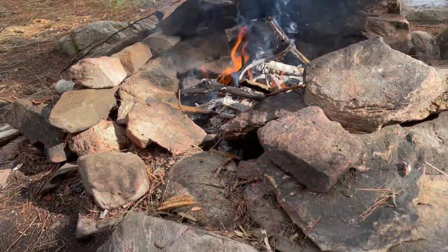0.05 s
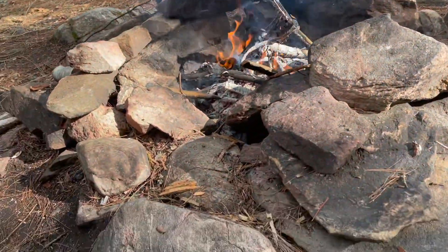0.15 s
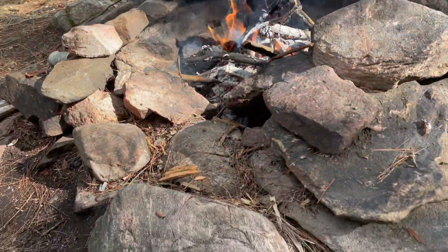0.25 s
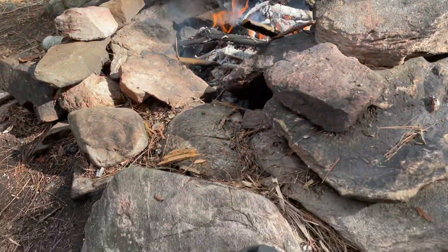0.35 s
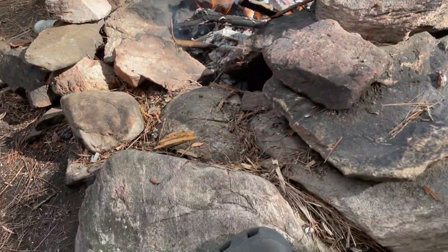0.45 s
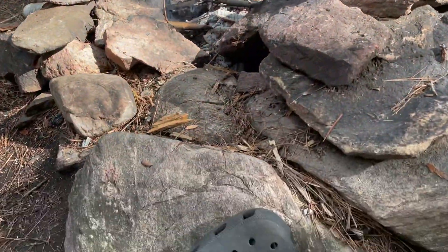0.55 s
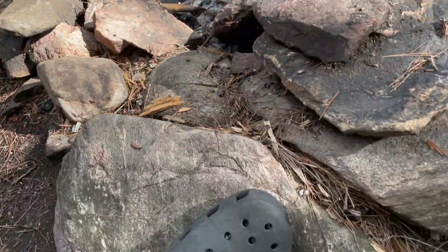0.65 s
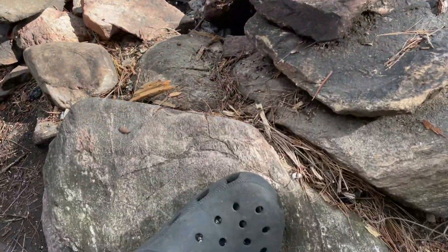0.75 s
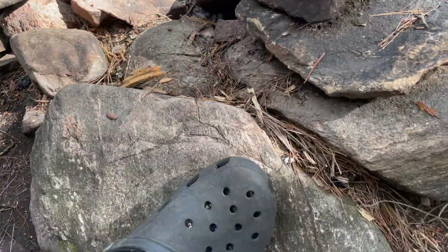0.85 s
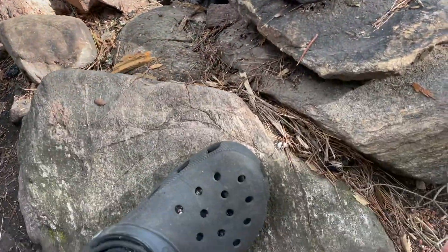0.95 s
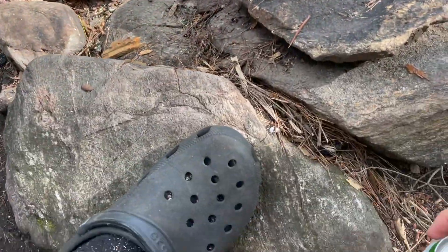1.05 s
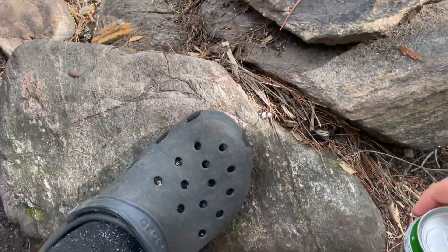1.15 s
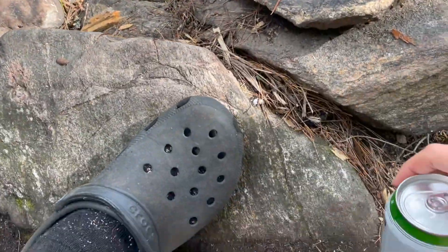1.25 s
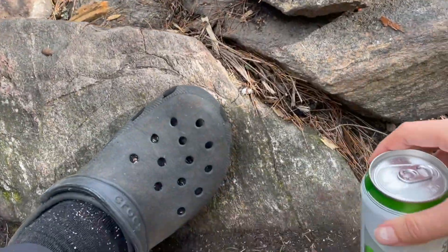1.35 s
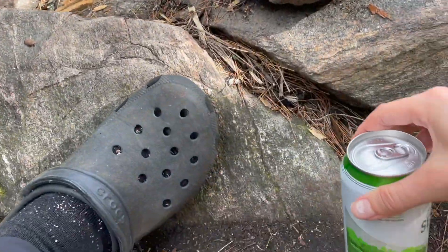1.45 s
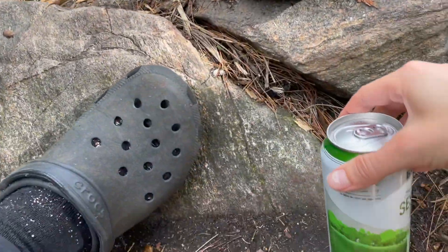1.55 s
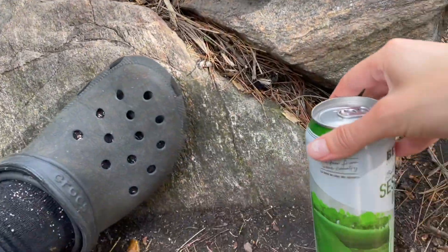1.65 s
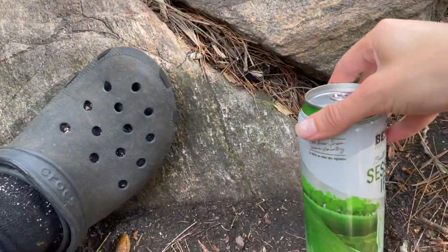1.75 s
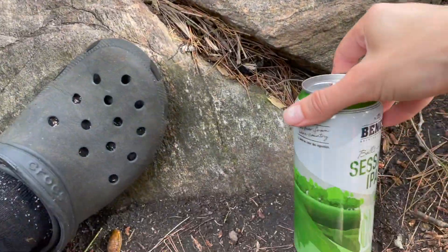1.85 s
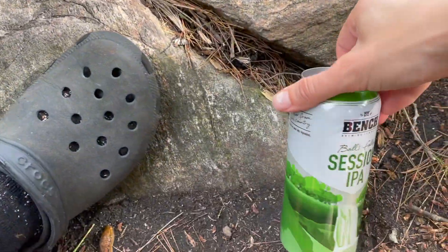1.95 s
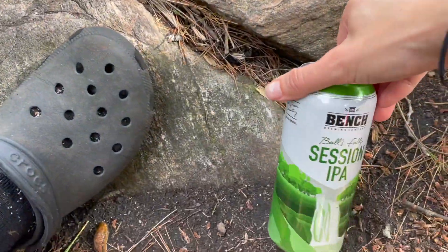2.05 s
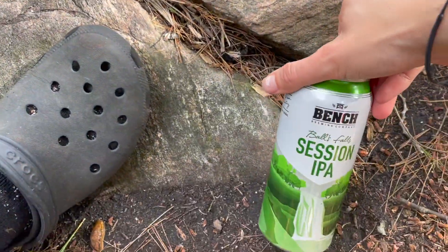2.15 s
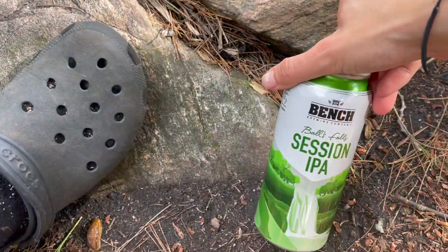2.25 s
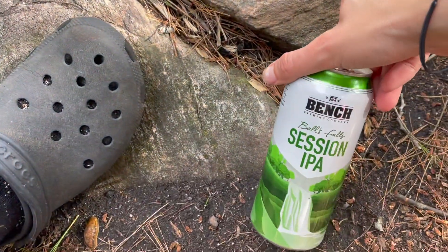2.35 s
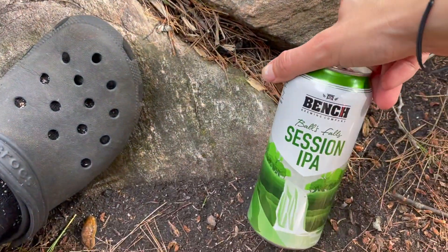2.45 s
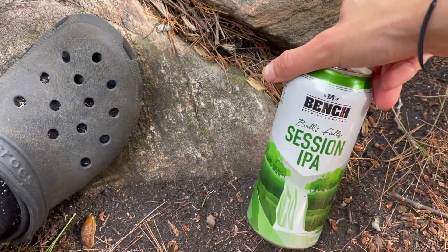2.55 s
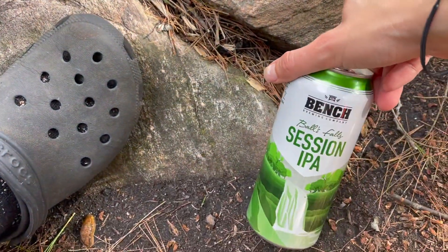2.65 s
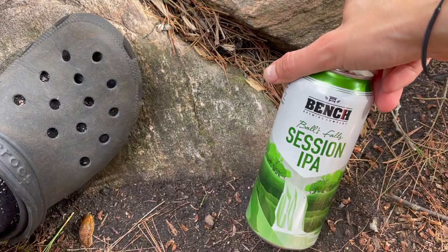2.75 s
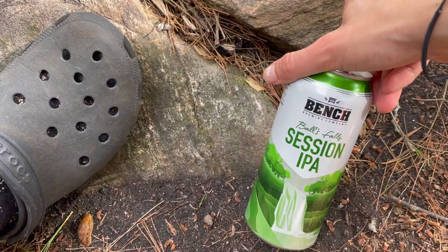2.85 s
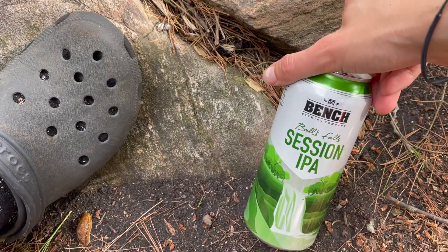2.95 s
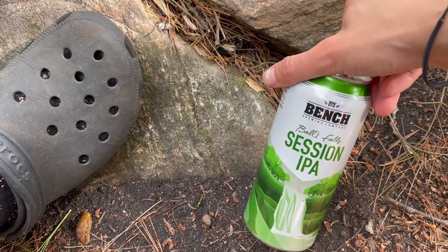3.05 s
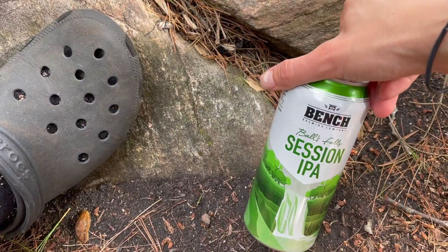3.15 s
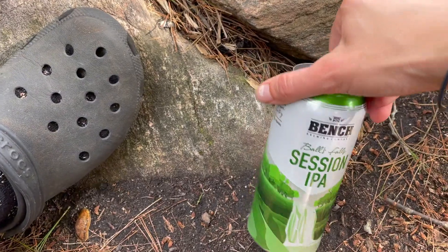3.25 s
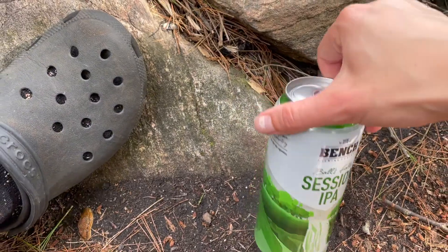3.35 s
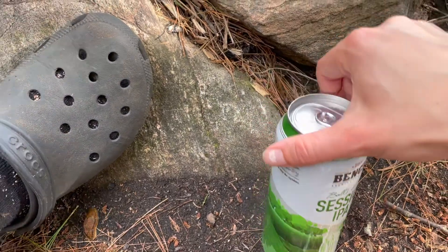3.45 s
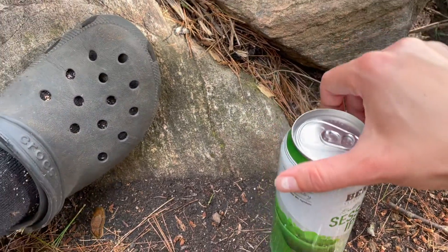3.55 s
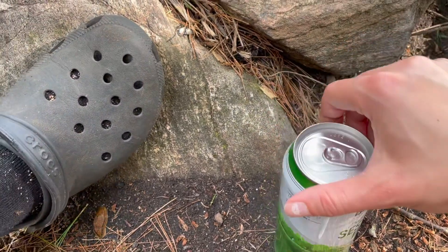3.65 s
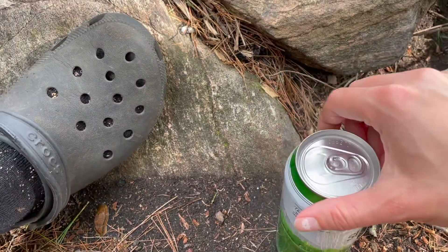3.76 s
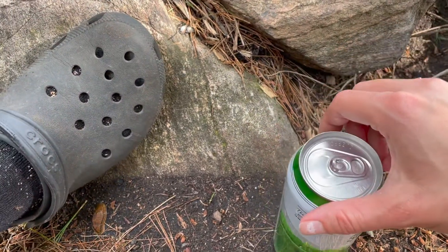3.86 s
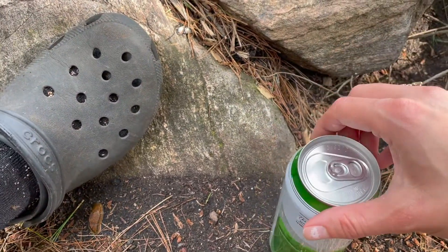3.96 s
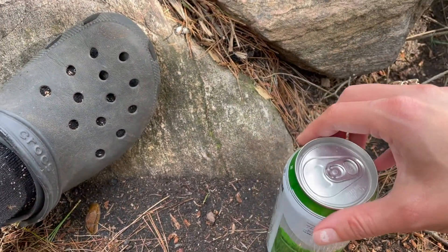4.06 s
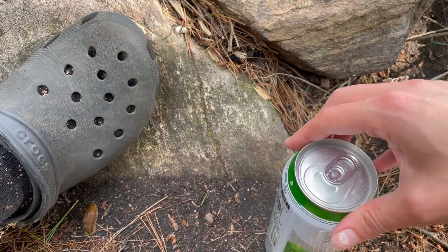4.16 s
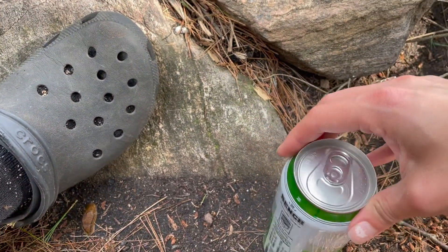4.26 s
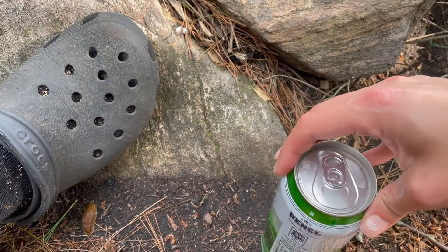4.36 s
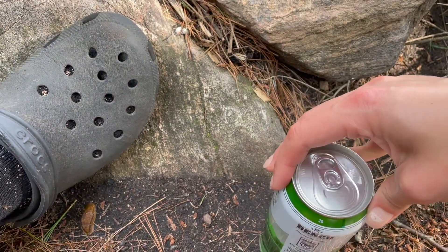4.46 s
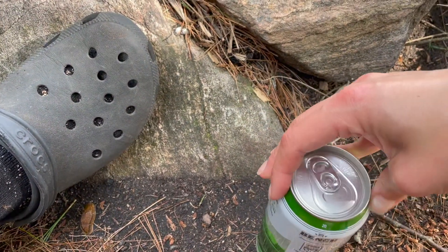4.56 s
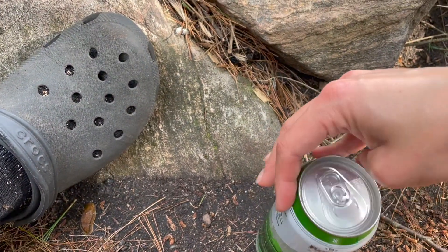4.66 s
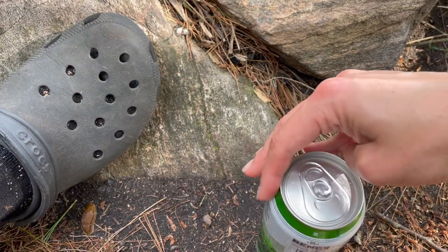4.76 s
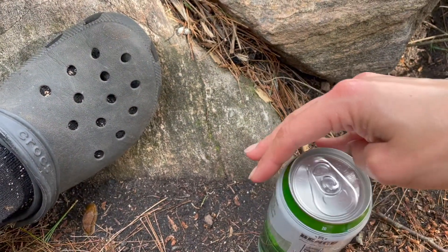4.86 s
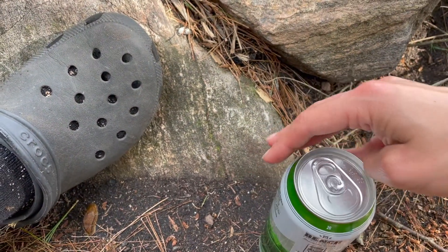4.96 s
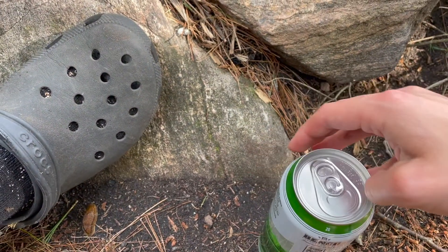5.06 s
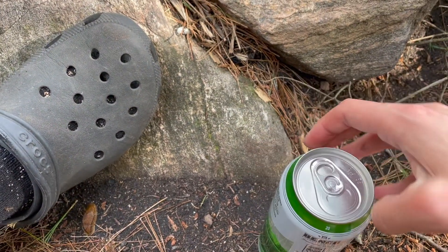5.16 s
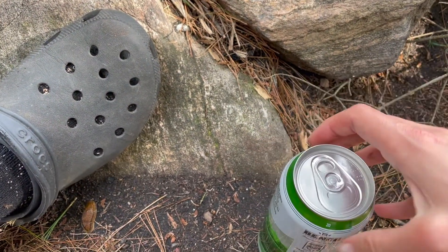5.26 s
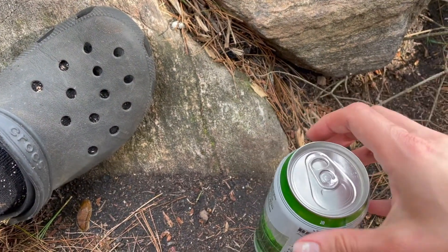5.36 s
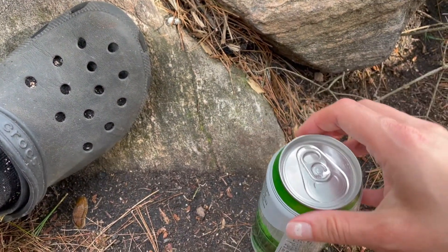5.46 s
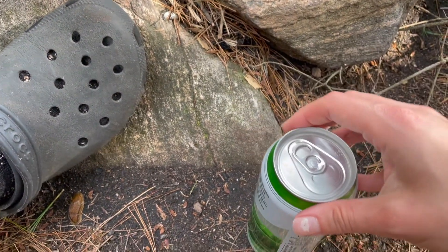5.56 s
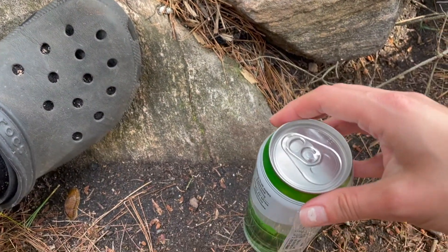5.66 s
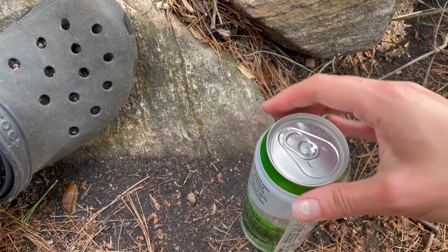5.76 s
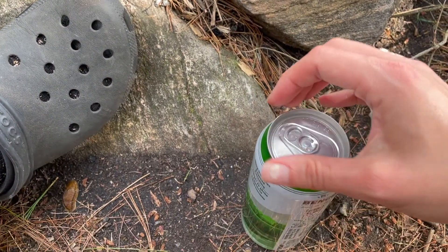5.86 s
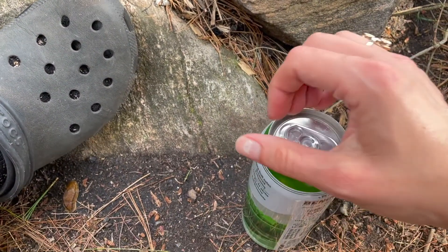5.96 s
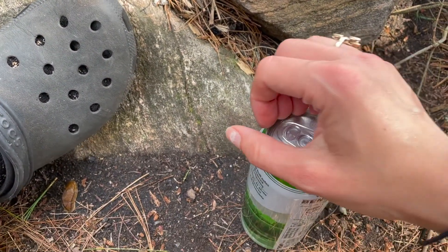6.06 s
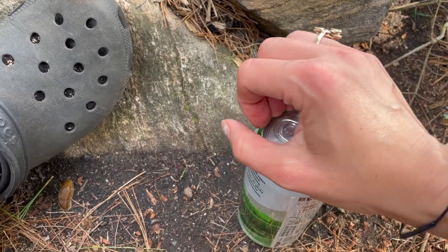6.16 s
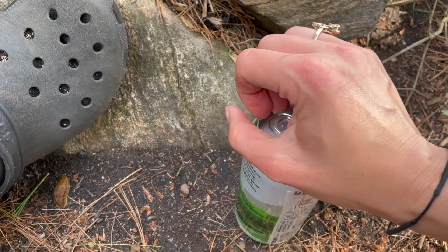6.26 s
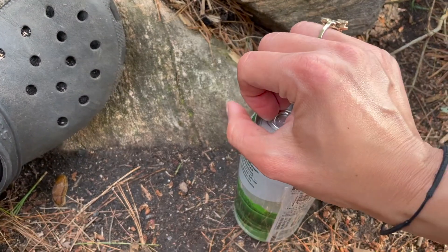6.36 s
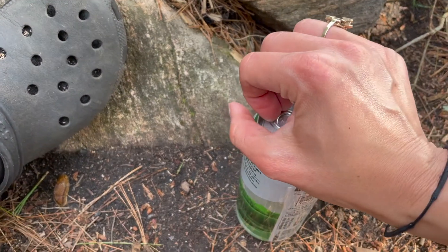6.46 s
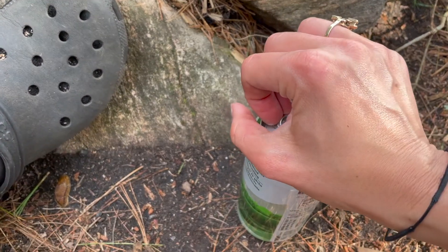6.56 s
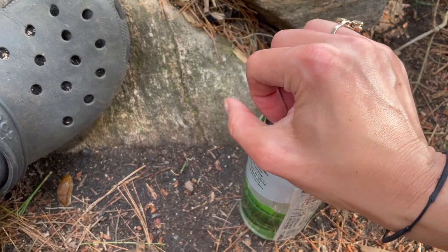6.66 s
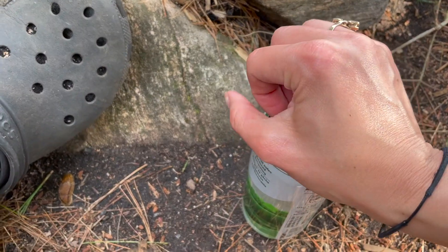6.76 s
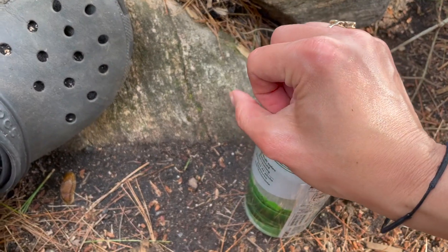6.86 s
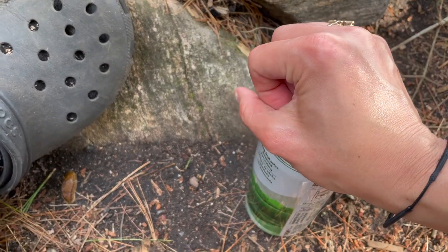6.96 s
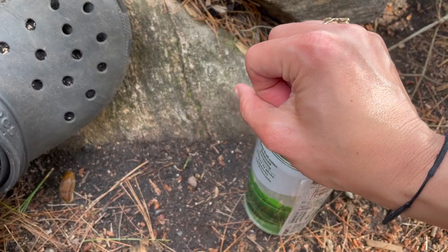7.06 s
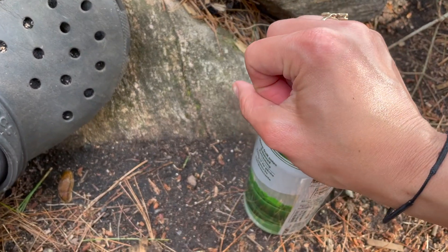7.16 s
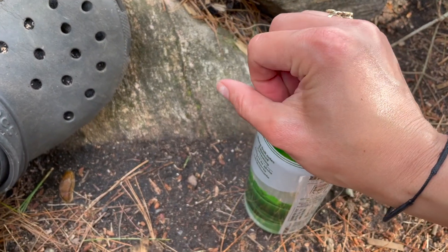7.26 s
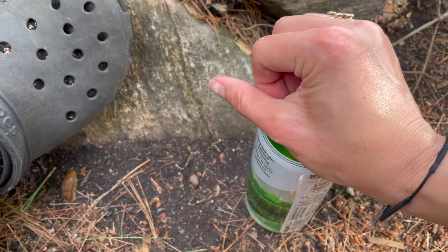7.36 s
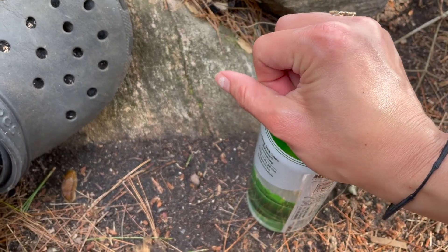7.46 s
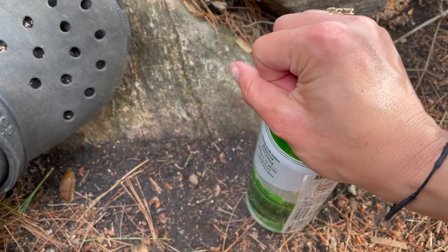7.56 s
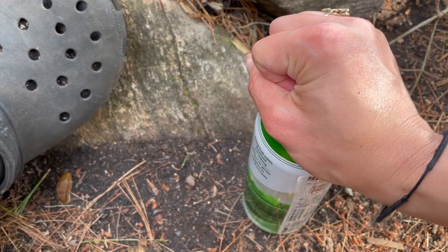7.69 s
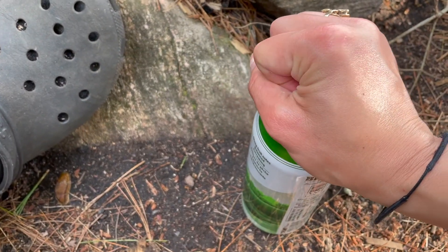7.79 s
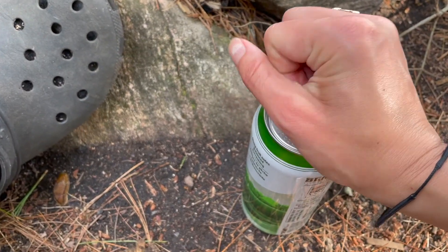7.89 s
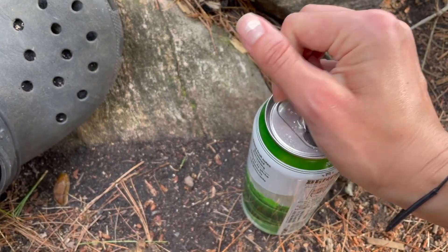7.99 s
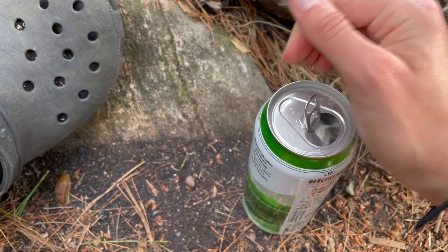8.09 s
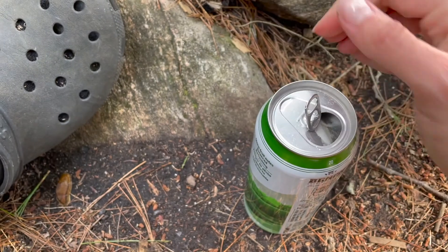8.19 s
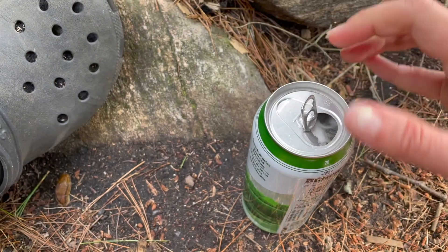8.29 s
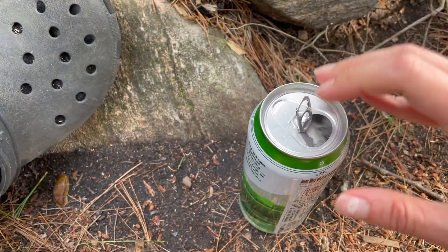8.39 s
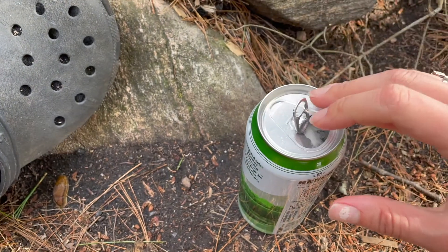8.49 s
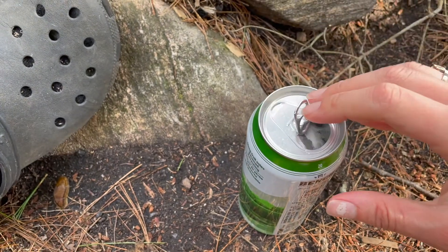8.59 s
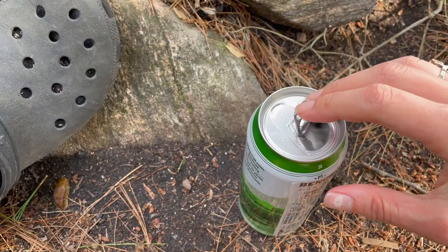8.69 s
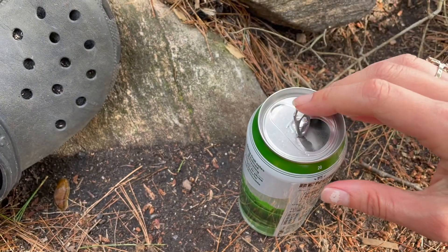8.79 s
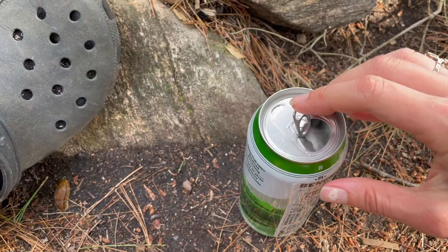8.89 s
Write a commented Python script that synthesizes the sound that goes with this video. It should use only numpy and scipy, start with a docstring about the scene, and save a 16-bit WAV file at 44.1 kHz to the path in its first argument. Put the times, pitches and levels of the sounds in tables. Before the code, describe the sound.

Outdoors by a campfire, with low rumble, thin sizzle and sharp wood pops. A full can grinds and bumps on gritty soil very close to the microphone, fingers slide and click on it, the tab creaks, the seal snaps with a gas burst, then the lid tears loudly open. Soft fizz and metallic taps follow.

```python
"""Beside a campfire, a full drink can is ground into gritty soil, tapped, and cracked open close by.
The fire hisses and pops over a low outdoor rumble: shaped noise and short bursts of noise.
Scrapes, clicks and knocks are noise and grains that set the can's resonances ringing.
The tab creaks in slips, the seal snaps in ragged bursts, gas rushes out as fluttering noise,
the lid tears in and the open can rings and fizzes."""
import sys
import numpy as np
from scipy import signal
from scipy.fft import rfft, irfft
from scipy.io import wavfile
from scipy.ndimage import uniform_filter1d

SR = 44100
rng = np.random.default_rng(int(sys.argv[2]) if len(sys.argv) > 2 else 0)


def master(y):
    """Save y as 16-bit WAV."""
    cut = np.clip(np.atleast_2d(y).T, -1, 1)
    pcm = np.round(cut * 32767)  # scale
    wavfile.write(sys.argv[1], SR, pcm.astype(np.int16))


N = 393813
TIME = np.arange(N) / SR  # seconds
HZ = np.fft.rfftfreq(N, 1 / SR)

# In every colour table, each row: frequency in Hz, relative level in dB per Hz.
# In every table of resonances, each row: frequency in Hz, width in Hz (wide dies fast), relative level in dB.

# Colour of the low outdoor rumble.
RUMBLE_COLOUR = [(20, -30.5), (52, 2), (81, 4), (128, -3.5), (181, 1.5), (250, -12.5), (375, -22.5),
                 (700, -31.5), (1500, -40)]
# Colour of the fire's breathy wash.
WASH_COLOUR = [(400, -35), (1280, 0), (4000, 3.5), (7000, 3.5), (11000, -7), (14300, -39.5)]
RUMBLE_DB, WASH_DB = -34.5, -66.5  # steady levels
# The fire flares up. Each row: start in seconds, length in seconds, level in dB.
FLARES = [(0.05, 1.71, -44.5), (1.01, 1.79, -47)]
# Rise and fall of the fire's thin sizzle. Each row: time in seconds, level in dB before SIZZLE_LIFT_DB.
SIZZLE_CURVE = [(0.1, -52), (0.7, -41), (1.55, -56.5), (2.0, -45.5), (3.5, -54), (4.5, -45.5), (5.2, -50.5),
                (8.9, -55)]
SIZZLE_LIFT_DB = 6.5
# Colour of the sizzle and of the bright top of the pops.
SIZZLE_COLOUR = [(3000, -12.5), (5800, -9), (9000, -6), (11000, 4), (14000, 0.5), (15800, 8.5)]
# The background dips briefly. Each row: start in seconds, length in seconds, depth in dB.
LULLS = [(3.73, 0.1, -3), (5.79, 0.13, -5.5), (7.592, 0.17, -7)]
# Fire pops. Each row: start in seconds, peak of the bright top in dB, peak of the woody body in dB.
POPS = [(0.1143, -34, -60), (0.2235, -13.5, -23.5), (0.2475, -22, -25), (0.402, -23.5, -60),
        (1.002, -45, -40.5), (1.1898, -12, -19), (1.2286, -28, -44), (1.906, -27, -42), (2.2366, -27, -39),
        (2.9464, -25.5, -41.5), (3.2468, -22.5, -49), (3.6533, -24, -45), (4.17, -16, -43),
        (4.551, -25, -42), (4.899, -21, -31), (5.095, -20.5, -47), (5.1738, -32, -36), (5.322, -30, -38.5),
        (5.441, -28, -37.5), (5.7652, -26.5, -60), (6.906, -17, -52), (7.452, -31, -61), (7.646, -18, -30),
        (8.166, -34, -43), (8.3167, -21.5, -47), (8.869, -27, -38)]
# Colour of a pop's woody body.
WOOD_COLOUR = [(300, 10.5), (1000, 16.5), (1700, 1.5), (2600, 17), (4500, 17), (7000, 18), (11000, -30)]
# Dry needles and soil shifting. Each row: start in seconds, level in dB, length in seconds.
RUSTLES = [(1.243, -44, 0.11), (4.432, -41.5, 0.33), (4.935, -47, 0.56), (5.128, -47.5, 0.16),
           (6.283, -46.5, 0.22), (8.355, -54.5, 0.34)]
# Dull bumps of the can on the soil. Each row: start in seconds, peak in dB, factor on the pitch.
BUMPS = [(2.669, -30.5, 0.76), (3.405, -25, 1.62), (3.434, -23, 0.61), (3.894, -26, 1.74),
         (3.931, -19.5, 0.52), (4.18, -32.5, 1.42), (4.374, -32.5, 1.9), (4.691, -27.5, 1.7),
         (4.715, -20, 0.58), (5.937, -23.5, 0.64)]
# Colour of a thud on soil, before the factor on the pitch.
SOIL_COLOUR = [(60, -20.5), (130, 10), (235, -0.5), (330, 3), (450, -16.5), (800, -21), (2500, -40)]

# Strokes of the can's base turning on grit. Each row: start in seconds, length in seconds, level of the
# drive in dB, grip of the hand from 0 to 1, low cut in Hz (high for a light touch).
RUBS = [(1.832, 0.12, -36, 1, 300), (3.082, 0.25, -45, 1, 2760), (3.274, 0.32, -43, 0.78, 1350),
        (3.551, 0.22, -45.5, 0.34, 1880), (3.823, 0.65, -36.5, 0.14, 1450), (4.09, 0.71, -39.5, 0.4, 1420),
        (4.4, 0.036, -32, 0, 1000), (4.671, 0.34, -45, 0.27, 1780), (5.361, 0.38, -40, 0.53, 1590),
        (5.986, 0.046, -35, 0, 2300), (6.186, 0.17, -35, 0.01, 2480), (8.214, 0.13, -48.5, 0.97, 2800)]
RUB_RISE, RUB_FALL = 0.35, 0.4  # shares of a stroke spent gathering speed and slowing down
# The broad colour of scraping grit.
GRIT_COLOUR = [(400, 17.5), (900, 11), (2500, 3.5), (5000, -8.5), (7000, 9), (9000, -8), (12000, -28.5)]
# Resonances of the full can's wall.
FULL_CAN = [(1089, 18.6, 8.5), (1953, 53, 8.5), (2380, 165, -8), (2710, 51, -6), (3950, 110, -3),
            (4594, 146, 2), (5100, 79, -2.5)]
# Resonances of the wall damped by the hand.
GRIPPED_CAN = [(1081, 26, 22), (2250, 134, 11.5), (2397, 43, 14.5), (4600, 580, -2)]
WALL_DRIFT, WALL_SWELL_DB = 0.01, 3.5  # typical shift (share of the pitch) and swell as the contact moves
# Fingertips sliding over the can. Each row: start in seconds, length in seconds, level of the grain in dB,
# level of the dry hiss in dB.
SLIDES = [(4.468, 0.16, -56, -49), (5.464, 0.23, -45.5, -45.5), (5.904, 0.66, -49, -44.5),
          (6.494, .46, -49.5, -43), (6.761, 0.058, -38.5, -54), (8.2, 0.4, -54, -50.5)]
# Colour of the fine grain under the fingertips.
FINGERTIP_COLOUR = [(900, -9.5), (2400, -1.5), (3800, 4.5), (5200, 2), (6800, 9.5), (9000, -8)]
# Grit and fingernail clicks on the sealed can. Each row: start in seconds, peak in dB, grip of the hand
# from 0 to 1, time in seconds for the drive to fall 60 dB.
CLICKS = [(3.246, -27, 1, 0.12), (3.316, -35.5, 0.9, 0.078), (4.614, -24.5, 0.76, 0.044),
          (4.668, -22.5, 0.3, 0.089), (4.682, -23.5, 0.8, 0.024), (4.794, -30.5, 0.6, 0.021),
          (4.89, -27, 0, 0.02), (4.95, -37, 0.1, 0.026), (6.464, -12, 0.16, 0.012),
          (6.4676, -15, 0.2, 0.015)]
NAIL_CUT_HZ = 2060  # a hard, light click hardly stirs the wall's lowest resonance

OPEN_S = 7.59  # the opening is free from here
# Tab and fingers knocking on the open can. Each row: start in seconds, peak in dB, time in seconds for the
# drive to fall 60 dB, factor on the resonances.
KNOCKS = [(7.918, -26, 0.0055, 0.79), (8.669, -13, 0.01, 0.9), (8.692, -31, 0.094, 0.66),
          (8.702, -28.5, 0.13, 0.91), (8.733, -38.5, 0.27, 0.8), (8.886, -31.5, 0.33, 0.95)]
# Resonances of the open can, before that factor.
OPEN_CAN = [(1344, 71, 16), (2105, 160, -1), (2570, 210, 13.5), (3230, 200, 3.5), (3800, 250, -3.5),
            (4600, 110, -3)]
# The opening's moving hollow note. Each row: time in seconds, frequency in Hz.
MOUTH_NOTE = [(7.6, 785), (7.649, 835), (7.907, 860), (7.928, 700), (8.03, 635), (8.159, 675)]
FIZZ_DB, FIZZ_T60, FIZZ_END_S = -41.5, 3.2, 8.27  # the foam settles: level, seconds to fall 60 dB, end
# The air in the can is jolted as the flap is pushed in. Each row: start in seconds, level in dB.
JOLTS = [(7.587, -24), (7.914, -31)]
JOLT_T60 = 0.061  # seconds to fall 60 dB
# Resonances of the lid once it is torn open.
TORN_LID = [(1097, 20, 6), (1230, 16, 6.5), (1770, 12, -9), (2020, 35, 1.5), (2870, 8.5, 0),
            (3680, 13, 8.5)]
LID_RING_DB, LID_RING_T60 = -33.5, 0.033  # the tear sets it ringing: peak, seconds for the drive to fall 60 dB
# The tab scrapes as it is bent back. Each row: start in seconds, peak in dB, time in seconds for the drive
# to fall 60 dB.
TAB_SCRAPES = [(7.794, -24, 0.015), (7.805, -17, 0.029), (7.818, -20, 0.0066)]
FINGER_DAMPING = 6  # a finger on the lid makes it die this many times faster

CREAK_S, SLIP_PERIOD_S, SLIP_COUNT = 6.825, 0.0185, 9
SLIP_DB, SLIP_GROWTH_DB_PER_S = -34, 33  # the tab's slips get louder as the pull grows
SLIP_SCATTER_DB = 1.5
# Colour of the finger dragging on the tab.
DRAG_COLOUR = [(300, -19), (650, 3), (1100, -13), (4000, -28)]
DRAG_DB = -47
# Puffs of gas through the cracked seal. Each row: start in seconds, length in seconds, flow in dB.
PUFFS = [(6.977, 0.14, -11.5), (7.089, 0.031, -22.5), (7.175, 0.077, -24.5), (7.28, 0.058, -29.5),
         (7.08, 0.42, -41.5), (7.497, 0.062, -23.5)]
PUFF_RISE, PUFF_FALL = 0.29, 0.39  # shares of a puff in which the crack widens and closes
VENT_DB, VENT_RISE_S, VENT_T60 = -24, 0.066, 0.53  # the last gas leaves through the full opening
# Colour of the rushing gas.
GAS_COLOUR = [(300, -13), (900, -1.5), (1450, 7.5), (2000, -8), (3200, 7.5), (6700, 3), (12000, -36)]
# Colour of the shrill jet, also used for the fingertips' dry hiss.
JET_COLOUR = [(4000, -32), (7000, -14.5), (9000, -12), (10500, 6), (14800, 8)]
HOLLOW_HZ, HOLLOW_RISE_HZ, HOLLOW_WIDTH_HZ = 1234, 190, 325  # the cupped hand sounds higher at full flow
# The tab breaking the seal and tearing the lid. Each row: start in seconds, peak in dB, rise in seconds,
# time in seconds for the drive to fall 60 dB, top sizzle in dB against that peak, low cut in Hz (high while
# the lid is still taut).
SNAPS = [(6.9867, -1, 0.00095, 0.013, 0, 2400), (7.532, -21, 0.00065, 0.011, -24.5, 900),
         (7.541, -10, 0.001, 0.014, -27.5, 900), (7.5455, 2, 0.0031, 0.01, -5, 1000),
         (7.555, -21, 0.0012, 0.13, -6.5, 700), (7.582, -3.5, 0.0076, 0.025, -0.5, 250),
         (7.59, -4.5, 0.00095, 0.0092, -9, 60), (7.597, -30.5, 0.0016, 0.17, -5.5, 400)]
# Resonances of the bending lid.
LID = [(1600, 880, -6), (2990, 46, 0.5), (3670, 300, -2.5), (4870, 400, -17)]
LID_SHIFT = .02  # typical shift of the lid's resonances from jerk to jerk as it bends
# Broad colour of tearing metal.
TEAR_COLOUR = [(120, -16), (250, 1), (480, -11), (1470, -19), (2300, -15.5), (3200, -2.5), (6300, -7.5),
               (10000, -24.5), (14000, -64)]

# How near sounds differ in phase at the two microphone ports. Each row: frequency in Hz, radians that left leads.
PORT_PHASE = [(50, 0), (500, .9), (1300, .7), (2400, 1.3), (6500, 1.9), (8500, 3), (10500, 1.1),
              (12300, .2)]
# How they differ in level. Each row: frequency in Hz, left minus right in dB.
PORT_BALANCE = [(100, 0), (600, 2), (1300, -.5), (2400, 3.5), (4400, 3), (8100, -.5), (15000, 0)]
# Stereo width of the surroundings. Each row: frequency in Hz, left-right likeness from -1 to 1.
LIKENESS = [(150, 0.96), (380, 0.76), (950, -0.085), (6000, 0.11), (11000, -0.78), (13000, 1)]
EDGE_HZ = 15880  # top of the final band


def gain_of(db):
    """Decibels to amplitude."""
    return 10 ** (np.asarray(db) / 20)


def evened(x):
    """Scales to an rms (average strength) of 1."""
    return x / np.sqrt(np.mean(x ** 2) + 1e-20)


def read(points, hz):
    """Reads a table on a log-frequency axis."""
    f, value = np.transpose(points)
    return np.interp(np.log(hz + 1), np.log(f + 1), value)


def level(rows):
    """A gain curve from rows of seconds and dB."""
    s, db = np.transpose(rows)
    return gain_of(np.interp(TIME, s, db))


def add(mix, s, sound):
    """Mixes a sound in at a time in seconds."""
    part = mix[max(round(s * SR), 0):][:len(sound)]
    part += sound[:len(part)]


def swell(start, length, rise, fall):
    """Smooth attack, hold and release; rise and fall are shares of the length."""
    u = (TIME - start) / length
    on = (u > 0) & (u < 1)
    out = np.zeros(N)
    ramp = np.clip(np.minimum(u[on] / rise, (1 - u[on]) / fall), 0, 1)
    out[on] = np.sin(np.pi / 2 * ramp) ** 2
    return out


def dying(start, rise, t60):
    """A quick rise, then a steady decay that falls 60 dB in t60 seconds."""
    t = TIME - start
    return np.clip(t / rise, 0, 1) * np.exp(-np.log(1000) * np.maximum(t - rise, 0) / t60)


def wander(per_s):
    """Slow chance of rms 1 that changes about so often a second."""
    knots = np.arange(0, N / SR + 1, .5 / per_s)
    return evened(np.interp(TIME, knots, rng.standard_normal(len(knots))))


def grains(per_s, spread_db):
    """Random clicks of rms 1, mostly small with a few large."""
    sizes = gain_of(spread_db * np.minimum(rng.exponential(1, N), 4))
    present = rng.random(N) < per_s / SR
    return evened(sizes * rng.choice([-1, 1], N) * present)


def burst(rise, t60, size=6000):
    """A crowd of tiny fractures, as noise that swells and dies away."""
    t = np.arange(size) / SR
    decay = gain_of(-60 * np.maximum(t - rise, 0) / t60)
    return rng.standard_normal(size) * np.minimum(t / rise, 1) * decay


def through(x, response):
    """Plays a drive through an impulse response."""
    return signal.oaconvolve(x, response)[:len(x)]


def above(x, cut_hz):
    """Weakens what lies under a frequency."""
    return signal.sosfilt(signal.butter(2, cut_hz, "high", fs=SR, output="sos"), x)


def colour(spectrum, size=2048):
    """An impulse response of unit energy with this spectrum and no sound ahead of time."""
    db = np.maximum(read(spectrum, abs(np.fft.fftfreq(size, 1 / SR))), -90)
    log_gain = np.log(gain_of(db))
    # the Hilbert transform gives the phase that puts the energy first
    taps = np.fft.ifft(np.exp(np.conj(signal.hilbert(log_gain)))).real
    return taps / np.linalg.norm(taps)


def body(modes, spectrum, broad_db, pitch=1, damping=1, size=9000):
    """Impulse response of a can: decaying resonances over a broad, dead response."""
    t = np.arange(size) / SR
    ring = np.zeros(size)
    for hz, width, db in modes:
        decay = np.exp(-np.pi * width * damping * t)
        ring += gain_of(db) * width * decay * np.cos(2 * np.pi * hz * pitch * t)
    ring = ring / np.linalg.norm(ring)
    add(ring, 0, gain_of(broad_db) * colour(spectrum))
    return ring / np.linalg.norm(ring)


def resonate(x, hz, width):
    """A resonance of gain 1 that follows a pitch curve for as long as it is driven."""
    driven, out = np.flatnonzero(x), np.zeros(N)
    on = slice(driven[0], driven[-1] + SR // 20)
    turn = np.exp(2j * np.pi * np.cumsum(hz[on]) / SR)
    r = np.exp(-np.pi * width / SR)
    # shift the pitch down to zero, smooth there, and shift it back up
    smooth = signal.lfilter([1 - r], [1, -r], x[on] * turn.conj() + 1e-18)
    out[on] = 2 * (turn * smooth).real
    return out


def crowded(x, t60, size=4000):
    """A crowd of weak, close resonances, as in a thin shell or a small hollow."""
    tail = burst(1 / SR, t60, size)
    return through(x, tail / np.linalg.norm(tail))


def loudest(x, db, size=88):
    """Sets the level of a hit's loudest 2 ms."""
    return gain_of(db) * x / np.sqrt(uniform_filter1d(x ** 2, size, mode="constant").max())


def surround(spectrum):
    """Stereo noise of rms 1, partly alike in both ports."""
    a, b = rfft(rng.standard_normal((2, N)))
    same = np.clip(read(LIKENESS, HZ), -1, 1)
    mid, side = a * np.sqrt(1 + same), b * np.sqrt(1 - same)
    return evened(irfft(np.array([mid + side, mid - side]) * gain_of(read(spectrum, HZ)), N))


def ports(x):
    """A near source reaches the left port with a phase lead and mostly louder."""
    half = np.exp(.5j * read(PORT_PHASE, HZ)) * gain_of(read(PORT_BALANCE, HZ) / 2)
    return irfft(rfft(x) * np.array([half, 1 / half]), N)


def rocks(x, t60, size=9000):
    """Short scattered echoes from the stones and the ground, different in each ear."""
    t = np.arange(size) / SR
    sparse = rng.random((2, size)) < .1
    taps = rng.standard_normal((2, size)) * sparse * (t > .002) * gain_of(-60 * t / t60)
    return np.array([through(x, side / np.linalg.norm(side)) for side in taps])


def outdoors():
    """Lumpy low rumble, the fire's flaring wash and its thin sizzle, all from shaped noise."""
    gusts = gain_of(1.7 * wander(per_s=60) + 1.3 * wander(per_s=6))
    rumble = gain_of(RUMBLE_DB) * evened(surround(RUMBLE_COLOUR) * gusts)
    flares = sum(gain_of(db) * swell(s, length, rise=0.33, fall=0.7) for s, length, db in FLARES)
    wash = (gain_of(WASH_DB) + flares) * surround(WASH_COLOUR)
    crackle = through(crowded(grains(per_s=90, spread_db=4.5), t60=.012), colour(SIZZLE_COLOUR))
    sizzle = surround(SIZZLE_COLOUR) * gain_of(1.5 * wander(per_s=20)) + gain_of(-8.0) * crackle
    return rumble + wash + gain_of(SIZZLE_LIFT_DB) * level(SIZZLE_CURVE) * sizzle


def lulls():
    """Gain of the background through its brief dips."""
    return gain_of(sum(db * swell(s, length, rise=.5, fall=0.48) for s, length, db in LULLS))


def fire_pops():
    """Pockets in the wood burst: a woody crack with a bright, very short top."""
    out, wood, top = np.zeros(N), colour(WOOD_COLOUR), colour(SIZZLE_COLOUR)
    for s, top_db, body_db in POPS:
        crack = burst(.0001, t60=.016)
        add(out, s, loudest(through(crack, wood), body_db))
        tick = burst(.0001, t60=.005)
        add(out, s, loudest(through(tick, top), top_db))
    echo = gain_of(-13) * rocks(out, t60=.04)
    return out + echo


def rustles():
    """Needles and crumbs of soil crush in short swells of crowded grains."""
    press = np.zeros(N)
    for s, db, length in RUSTLES:
        press += gain_of(db) * np.sin(np.pi * np.clip((TIME - s) / length, 0, 1)) ** 2
    crumbs = crowded(grains(per_s=2000, spread_db=3) * gain_of(3.5 * wander(per_s=30)), t60=.04)
    return through(press * evened(crumbs), colour([(250, -20), (550, 5.5), (2400, 0), (8000, -16.5)]))


def bumps():
    """The can's weight thuds on soft soil; the pitch factor makes a thud duller or brighter."""
    out = np.zeros(N)
    for s, db, pitch in BUMPS:
        thud = colour([(hz * pitch, gain_db) for hz, gain_db in SOIL_COLOUR])
        add(out, s, loudest(through(burst(0.0016, t60=0.25), thud), db))
    return out


def sealed_can():
    """Grit scrapes under the full can; its resonances drift and swell, and a firm grip damps them."""
    grit = evened(grains(per_s=3500, spread_db=3.5) * gain_of(1.2 * wander(per_s=45)))
    loose, firm = np.zeros((2, N))
    for s, length, db, grip, cut_hz in RUBS:
        stroke = gain_of(db) * swell(s, length, RUB_RISE, RUB_FALL) * above(grit, cut_hz)
        grip = np.clip(grip, 0, 1)
        loose += stroke * np.sqrt(1 - grip)
        firm += stroke * np.sqrt(grip)
    wall = np.zeros(N)
    for hz, width, db in FULL_CAN:
        drift = WALL_DRIFT * wander(per_s=7)
        lift_db = WALL_SWELL_DB * wander(per_s=12)
        wall += resonate(loose * gain_of(db + lift_db), hz * (1 + drift), width)
    scrape = through(loose, colour(GRIT_COLOUR))
    held = through(firm, body(GRIPPED_CAN, GRIT_COLOUR, broad_db=-12))
    return gain_of(10) * wall + gain_of(-10) * scrape + held


def fingertips():
    """Skin and nails slide over the can, feeling for the tab: a fine grain and a dry hiss."""
    grain, hiss = np.zeros((2, N))
    for s, length, db, hiss_db in SLIDES:
        stroke = swell(s, length, rise=0.19, fall=0.18)
        grain += gain_of(db) * stroke
        hiss += gain_of(hiss_db) * stroke
    fine = through(grain * grains(per_s=13000, spread_db=5.5), colour(FINGERTIP_COLOUR))
    return fine + through(hiss * rng.standard_normal(N), colour(JET_COLOUR))


def clicks():
    """Grit and fingernails catch on the sealed can; the grip blends its free and held ringing."""
    out = np.zeros(N)
    wall = body(FULL_CAN, GRIT_COLOUR, broad_db=-3, damping=1.7)
    held = body(GRIPPED_CAN, GRIT_COLOUR, broad_db=-25)
    for s, db, grip, t60 in CLICKS:
        scratch = above(burst(0.00045, t60), NAIL_CUT_HZ)
        add(out, s, loudest(through(scratch, (1 - grip) * wall + grip * held), db))
    return out


def open_can():
    """The tab is pushed back and tapped; the covering hand lowers the can's resonances."""
    out = np.zeros(N)
    for s, db, t60, pitch in KNOCKS:
        blow = gain_of(-0.5) * burst(1 / SR, t60)  # a short rattle follows the blow
        blow[0] = 1
        can = body(OPEN_CAN, TEAR_COLOUR, broad_db=-24, pitch=pitch)
        add(out, s, loudest(through(blow, can), db))
    return out


def mouth(width_hz=85, upper_hz=1082):
    """Fizz sounds the air in the opened can: two breathy notes, one moving and one steady."""
    s, hz = np.transpose(MOUTH_NOTE)
    r = np.exp(-np.pi * width_hz / SR)
    notes = []
    for pitch in (np.interp(TIME, s, hz), np.full(N, upper_hz)):
        noise = rng.standard_normal(N) + 1j * rng.standard_normal(N)
        flutter = signal.lfilter([1], [1, -2 * r, r * r], noise)  # slow noise, then moved up to the pitch
        notes.append(evened((flutter * np.exp(2j * np.pi * np.cumsum(pitch) / SR)).real))
    covered = np.interp(TIME, [7.93, 8.05], [1.1, .1])  # the upper note fades
    ending = np.clip((FIZZ_END_S - TIME) / 0.042, 0, 1)
    fizz = gain_of(FIZZ_DB) * dying(OPEN_S, 0.0094, FIZZ_T60) * ending
    jolt = sum(gain_of(db) * dying(s, 0.009, JOLT_T60) for s, db in JOLTS)
    return (fizz + jolt) * (gain_of(1.0) * notes[0] + covered * notes[1])


def torn_lid():
    """The torn lid rings freely from the tear, and sounds briefly as the tab scrapes back."""
    out = np.zeros(N)
    free = body(TORN_LID, TEAR_COLOUR, broad_db=-34)
    touched = body(TORN_LID, TEAR_COLOUR, broad_db=-22, damping=FINGER_DAMPING)
    add(out, OPEN_S, loudest(through(burst(0.00107, LID_RING_T60, size=12000), free), LID_RING_DB))
    for s, db, t60 in TAB_SCRAPES:
        add(out, s, loudest(through(burst(0.00092, t60), touched), db))
    return out


def creak(fastest_hz=1400, size=2048):
    """The tab sticks and slips; each slip spreads into a rough chirp, its lows and highs arriving late."""
    out, hz = np.zeros(N), np.fft.rfftfreq(size, 1 / SR)
    octaves = np.clip(np.log2((hz + 1) / fastest_hz), -2, 1)
    lag = .001 + np.where(octaves < 0, .0018, .003) * octaves ** 2  # seconds
    slip_colour = [(150, 2.5), (550, -7.5), (900, -15.0), (1300, -22), (2200, -14.0), (2800, -33), (6000, -29)]
    shape = gain_of(read(slip_colour, hz))
    chirp = irfft(shape * np.exp(-2j * np.pi * np.cumsum(lag) * SR / size))
    for t in np.arange(SLIP_COUNT) * SLIP_PERIOD_S:
        db = SLIP_DB + SLIP_GROWTH_DB_PER_S * t + SLIP_SCATTER_DB * rng.standard_normal()
        start = CREAK_S + t + .0015 * rng.standard_normal()
        add(out, start, loudest(through(burst(0.002, t60=0.035), chirp), db))
    # the finger drags throughout the slips
    stroke = swell(CREAK_S - SLIP_PERIOD_S, (SLIP_COUNT + 1) * SLIP_PERIOD_S, RUB_RISE, RUB_FALL)
    drag = stroke * rng.standard_normal(N)
    return out + gain_of(DRAG_DB) * through(drag, colour(DRAG_COLOUR))


def gas_flow():
    """Gas escapes in puffs while the seal is only cracked, then drains away."""
    puffs = sum(gain_of(db) * swell(s, length, PUFF_RISE, PUFF_FALL) for s, length, db in PUFFS)
    return puffs + gain_of(VENT_DB) * dying(OPEN_S, VENT_RISE_S, VENT_T60)


def gas(growth=1.84, full_flow_db=-11.0, flutter_db=2):
    """A leak sputters in the hollow of the hand; the rush and its shrill jet grow faster than the flow."""
    flow = gas_flow()
    effort = flow / gain_of(full_flow_db)
    flutter = gain_of(flutter_db * wander(per_s=220))
    pitch = HOLLOW_HZ + HOLLOW_RISE_HZ * effort
    sputter = grains(per_s=3700, spread_db=5) * flow * flutter
    hollow = resonate(resonate(sputter, pitch, HOLLOW_WIDTH_HZ), pitch, HOLLOW_WIDTH_HZ)
    rush = crowded(rng.standard_normal(N) * effort ** growth, t60=0.02) * flutter
    pressure = np.interp(TIME, [7.05, 7.12], [1, .15])  # the first rush spends most of it
    jet = pressure * through(rush, colour(JET_COLOUR))
    return gain_of(8.5) * hollow + gain_of(-16.5) * through(rush, colour(GAS_COLOUR)) + gain_of(-4.5) * jet


def snaps(ragged_db=3):
    """The scored aluminium gives way in ragged jerks that ring the bending lid."""
    out, top = np.zeros(N), colour([(3000, -21.5), (7000, 11.0), (15500, 1)])
    for s, db, rise, t60, top_db, cut_hz in SNAPS:
        pitch = 1 + LID_SHIFT * rng.standard_normal()
        lid = above(body(LID, TEAR_COLOUR, broad_db=-6, pitch=pitch), cut_hz)
        tear, spray = burst(rise, t60), burst(rise, t60)
        ragged = evened(uniform_filter1d(rng.standard_normal(len(tear)), size=30))
        crackle = gain_of(ragged_db * ragged)
        add(out, s, loudest(through(tear * crackle, lid), db))
        add(out, s, loudest(through(spray * crackle, top), db + top_db))
    return out


def scene():
    """The can close by, the fire and the open air behind it."""
    ground = rustles() + bumps()
    handling = sealed_can() + fingertips() + clicks()
    opened = open_can() + mouth() + torn_lid()
    can = ground + handling + opened + creak() + gas() + snaps()
    scattered = signal.sosfilt(signal.butter(2, 7000, fs=SR, output="sos"), can)  # echoes lose treble
    near = ports(can) + gain_of(-10.0) * rocks(scattered, t60=0.098)
    return lulls() * outdoors() + fire_pops() + near


def record(dry, threshold_db=-17, recovery_db_per_s=45, share=0.44):
    """Overload rounds off the peaks, a lagging gain control ducks what follows, then the top is cut."""
    clipped = dry / (1 + dry ** 8) ** (1 / 8)
    power_db = 10 * np.log10(abs(uniform_filter1d((clipped ** 2).mean(0), size=400)) + 1e-12)
    # hold each loud peak and let it sink at a steady rate
    fall = TIME * recovery_db_per_s
    held_db = np.maximum(np.maximum.accumulate(power_db + fall) - fall - threshold_db, 0)
    duck_db = share * np.roll(uniform_filter1d(held_db, size=1500), round(.1 * SR))  # 0.1 s late
    lowpass = signal.firwin(511, EDGE_HZ, window=("kaiser", 8), fs=SR)
    return signal.oaconvolve(clipped / gain_of(duck_db), lowpass[None], "same")


dry = scene()
out = record(dry)
master(out)
```